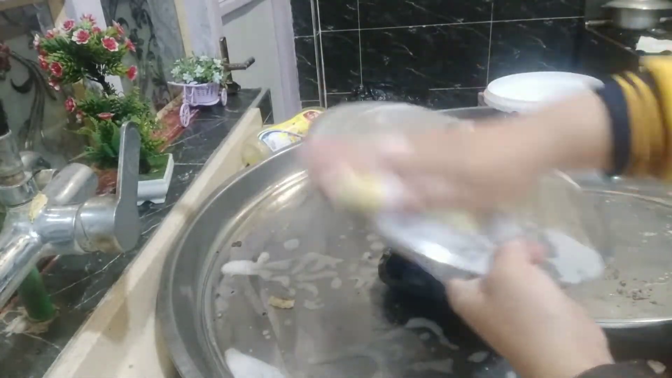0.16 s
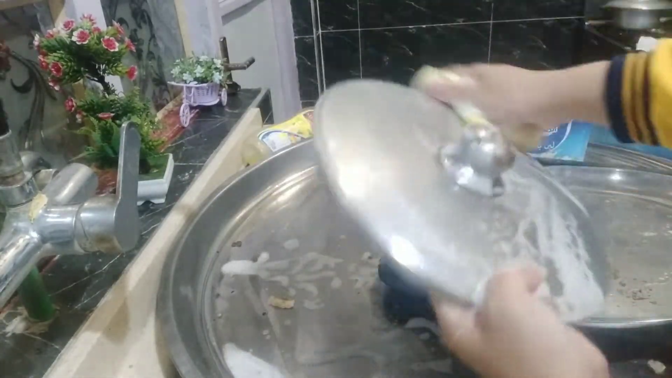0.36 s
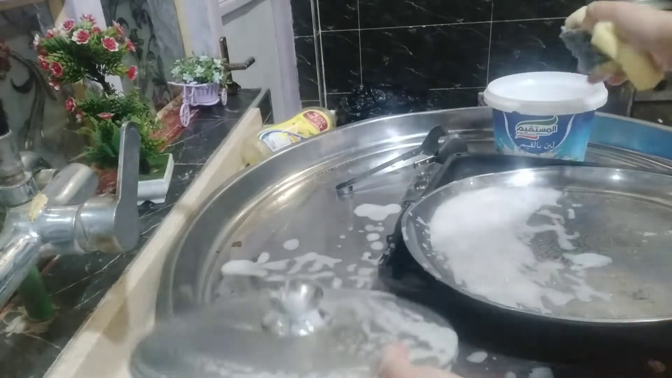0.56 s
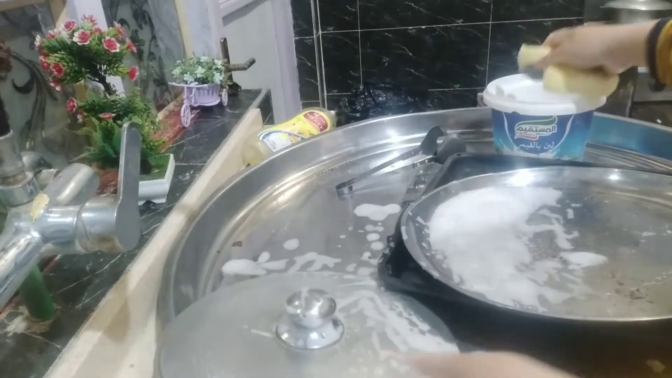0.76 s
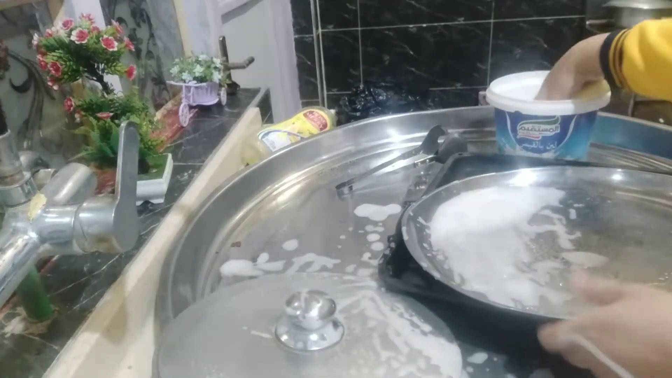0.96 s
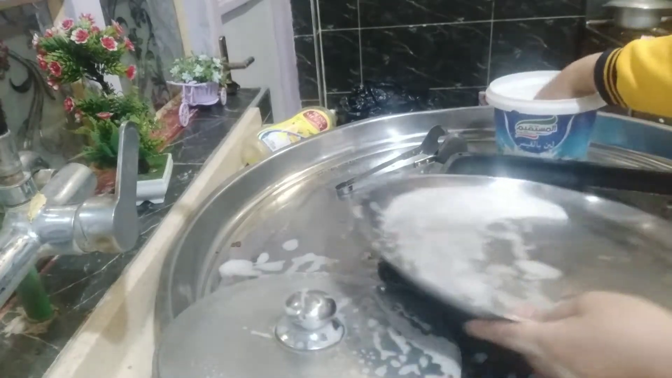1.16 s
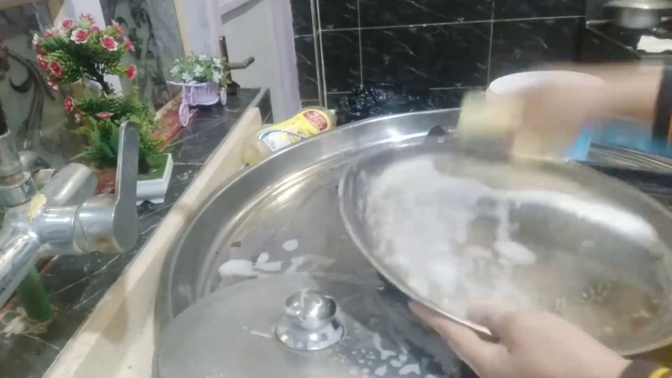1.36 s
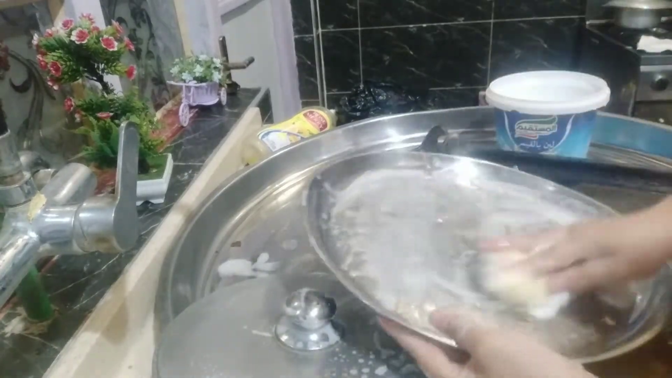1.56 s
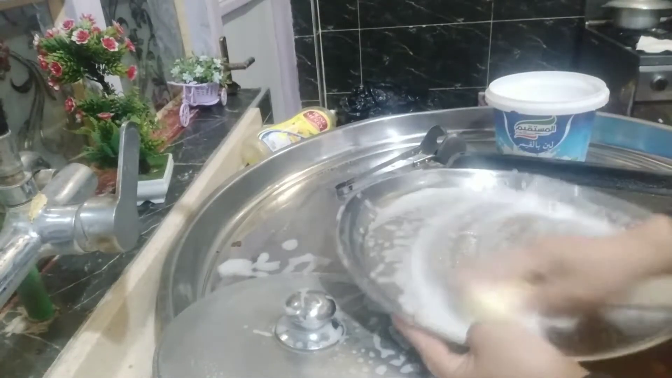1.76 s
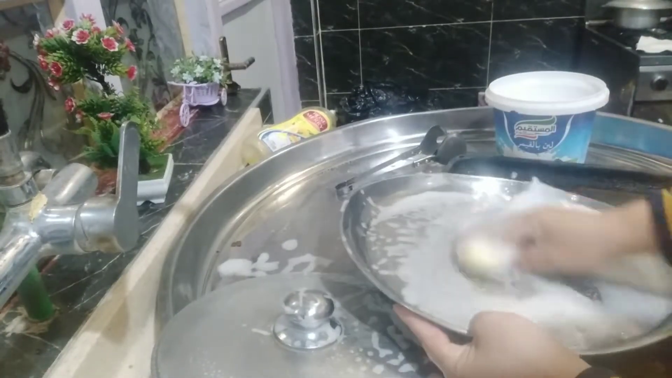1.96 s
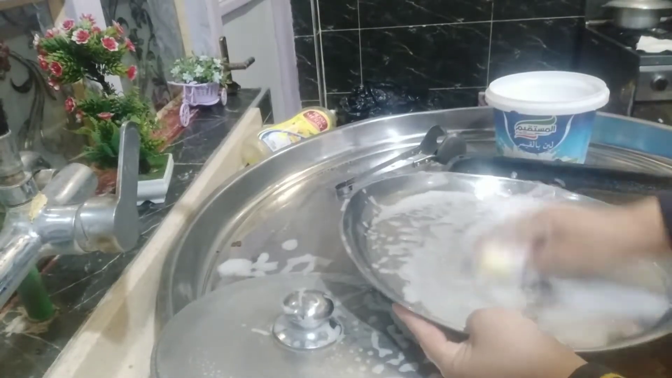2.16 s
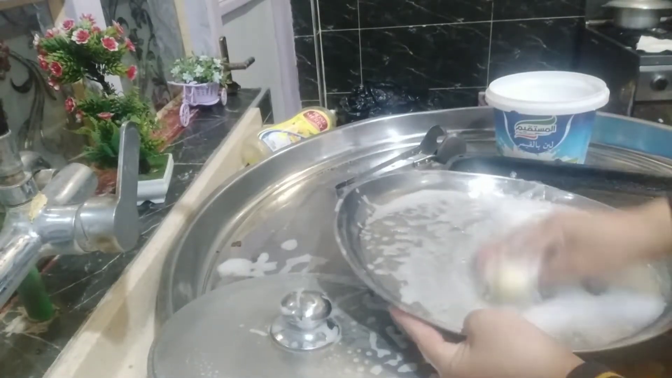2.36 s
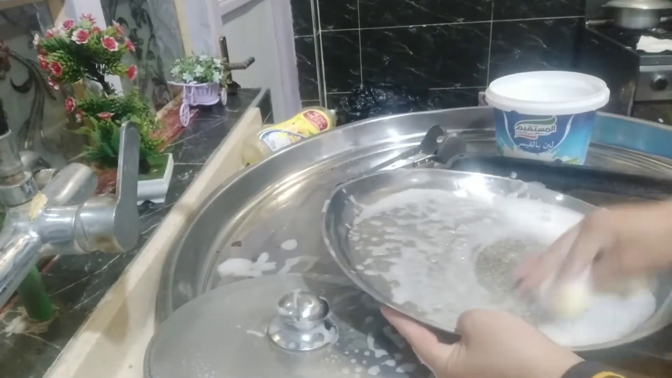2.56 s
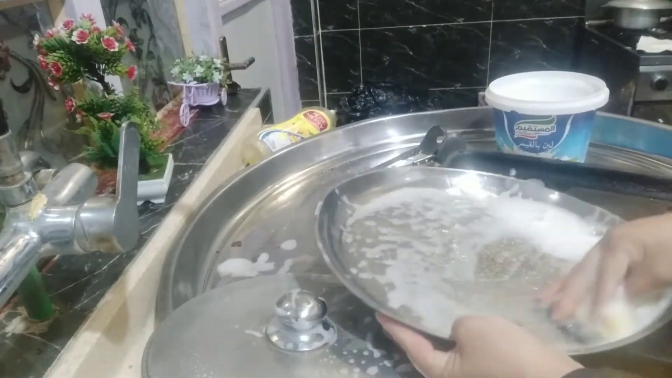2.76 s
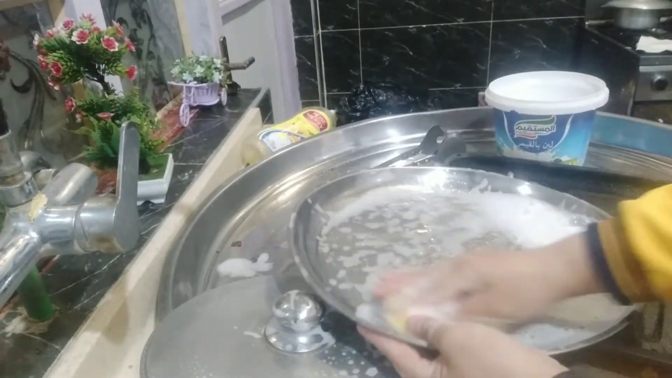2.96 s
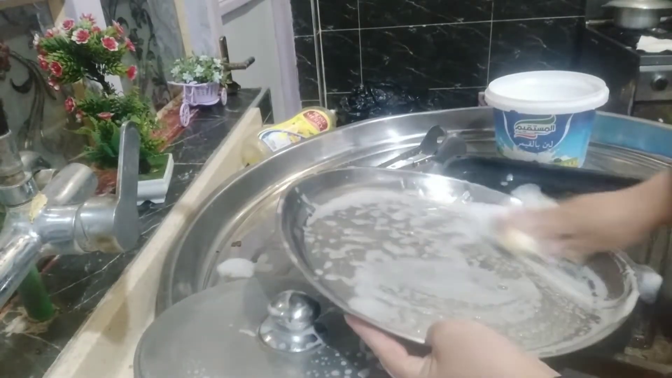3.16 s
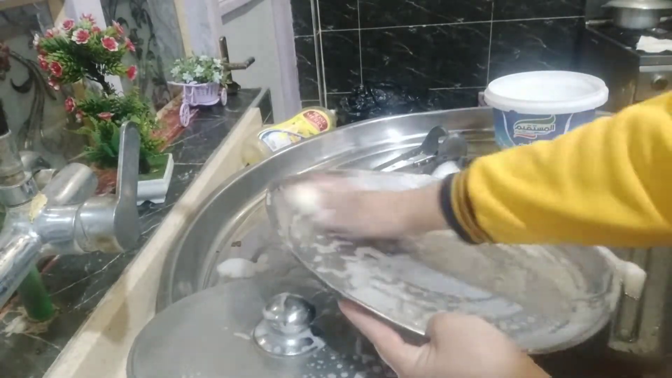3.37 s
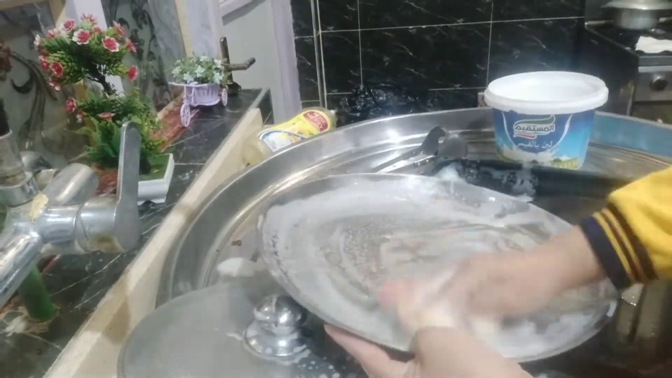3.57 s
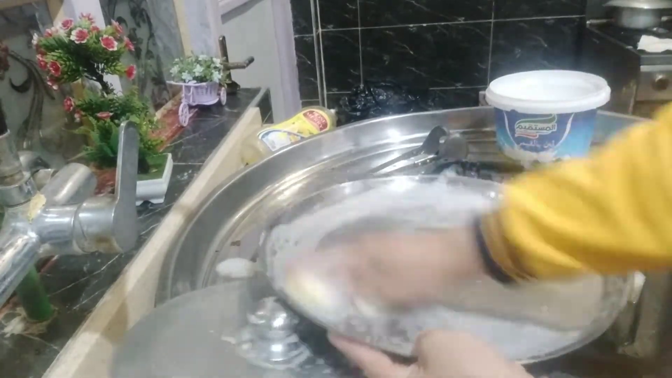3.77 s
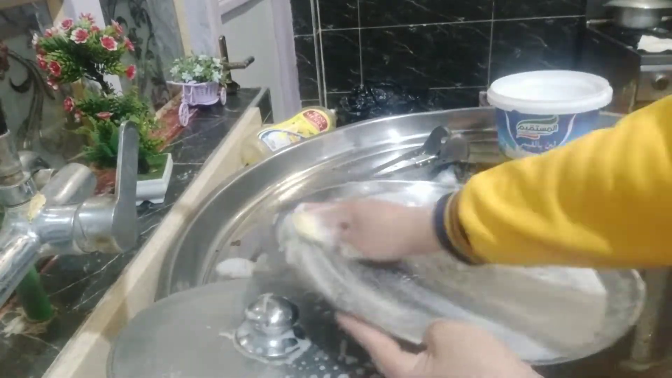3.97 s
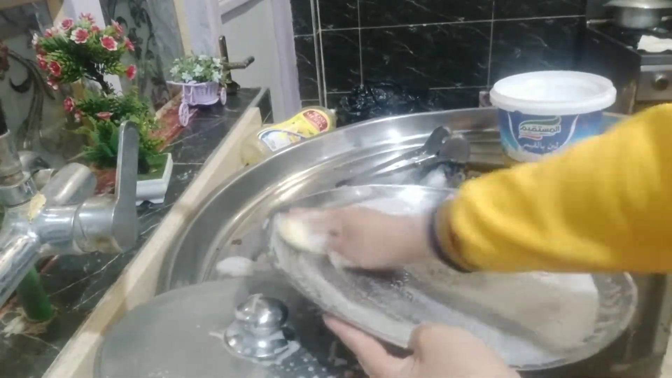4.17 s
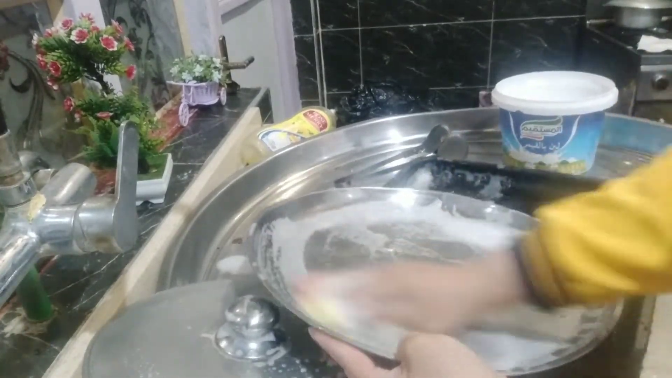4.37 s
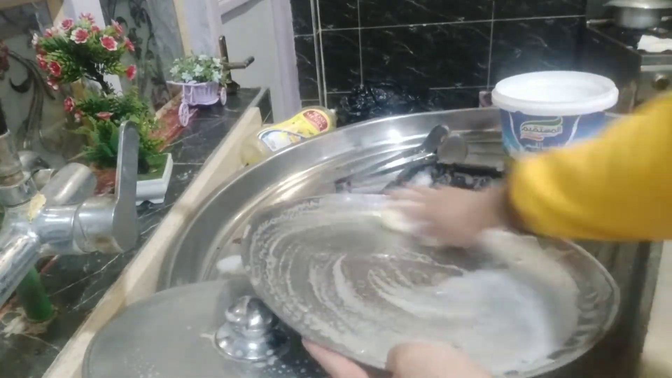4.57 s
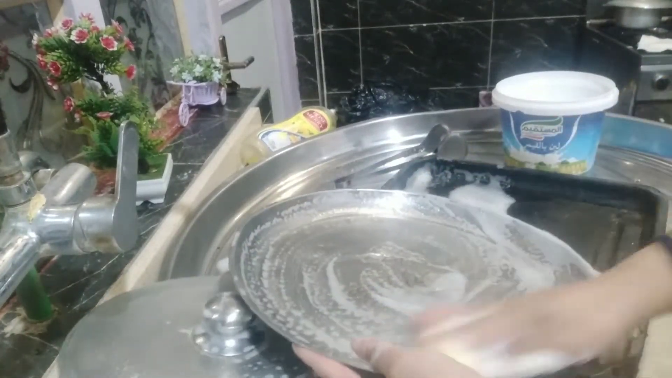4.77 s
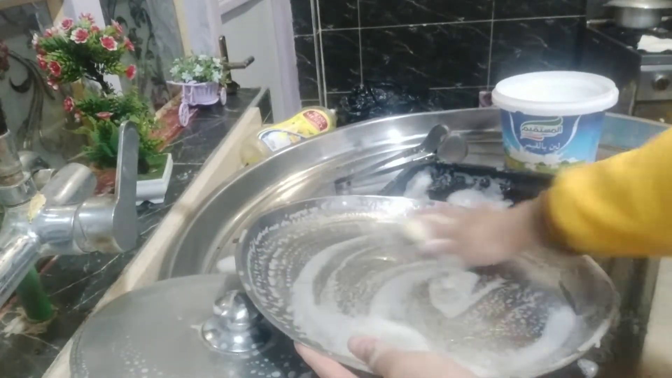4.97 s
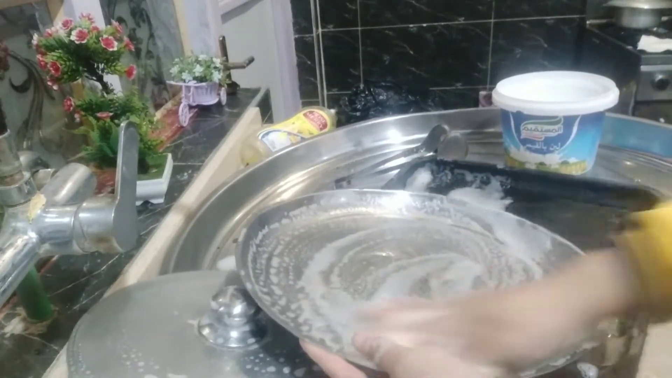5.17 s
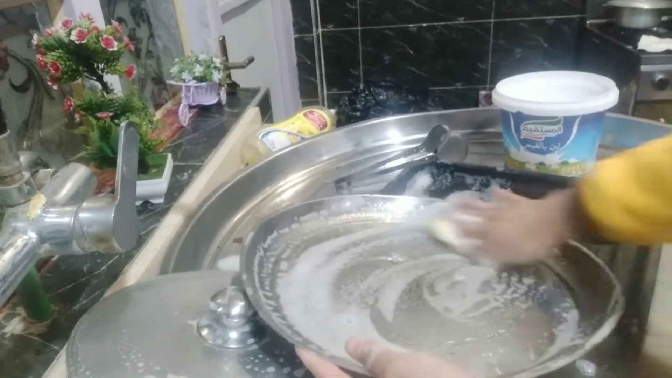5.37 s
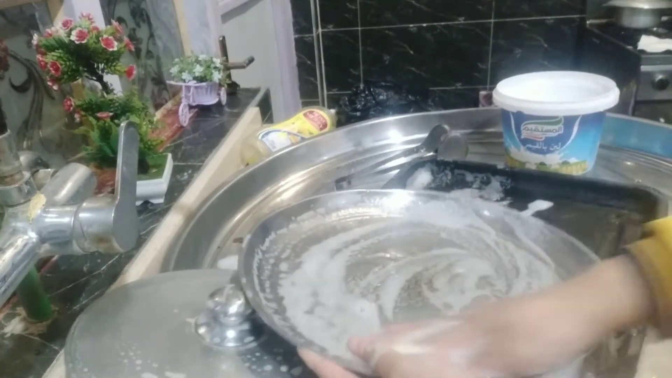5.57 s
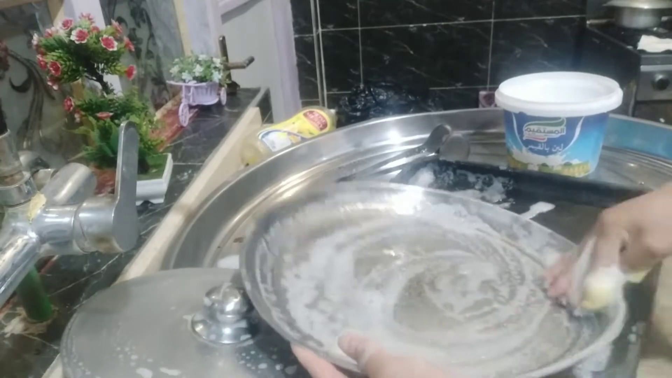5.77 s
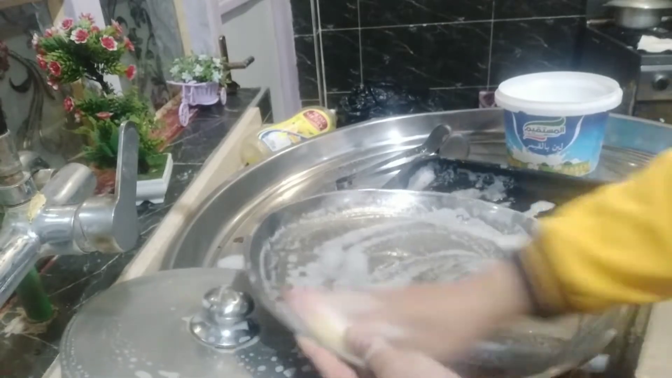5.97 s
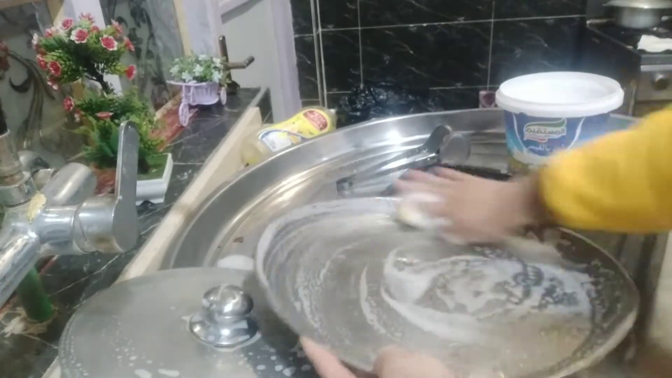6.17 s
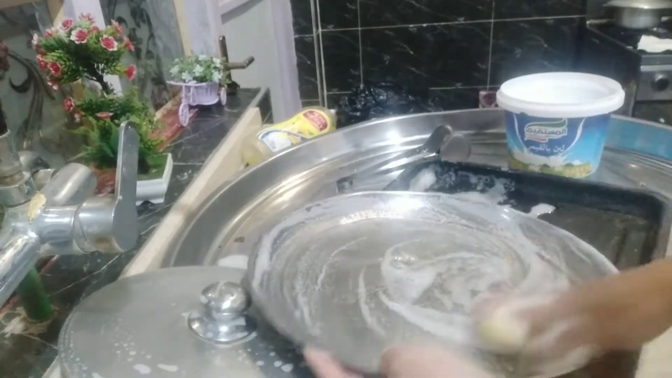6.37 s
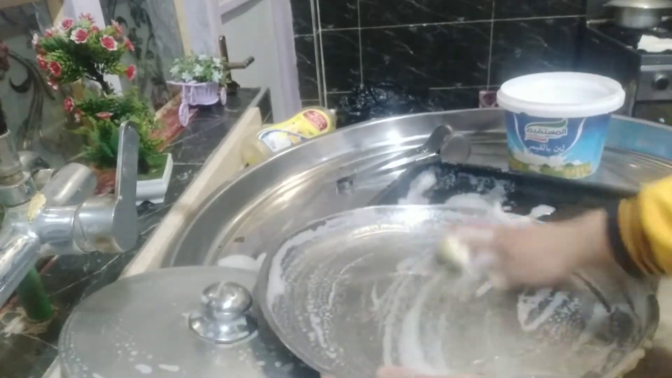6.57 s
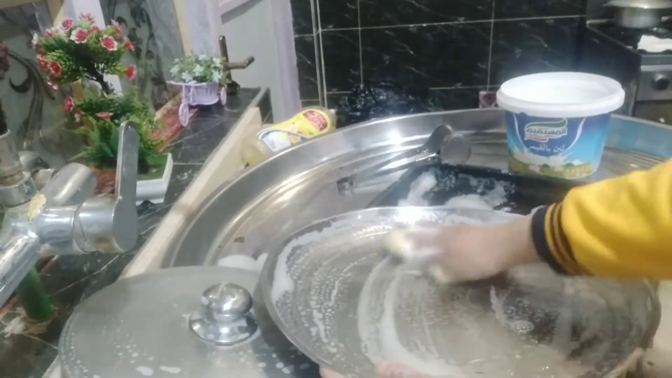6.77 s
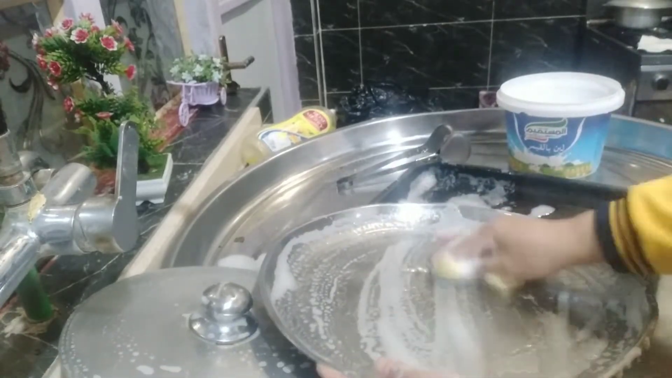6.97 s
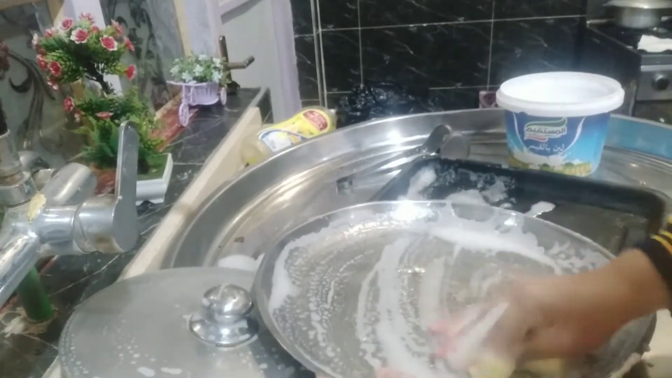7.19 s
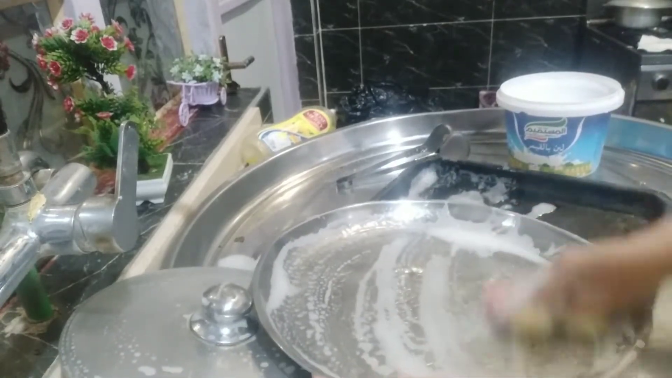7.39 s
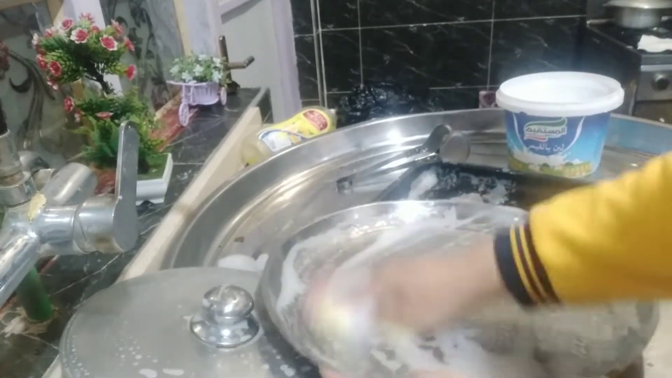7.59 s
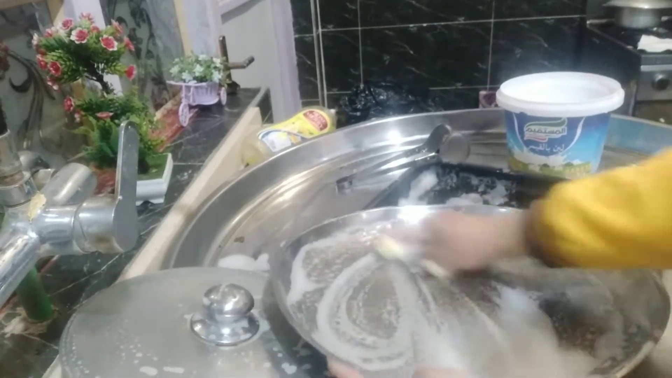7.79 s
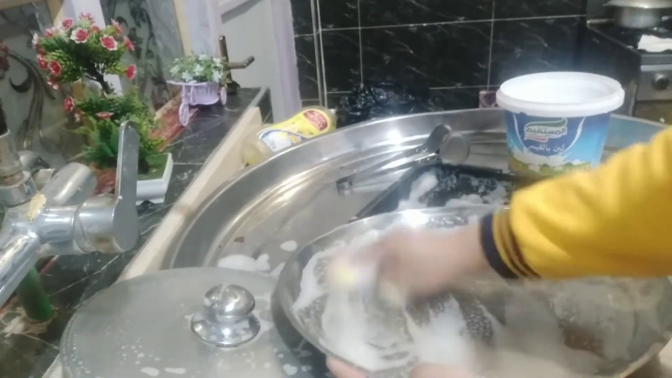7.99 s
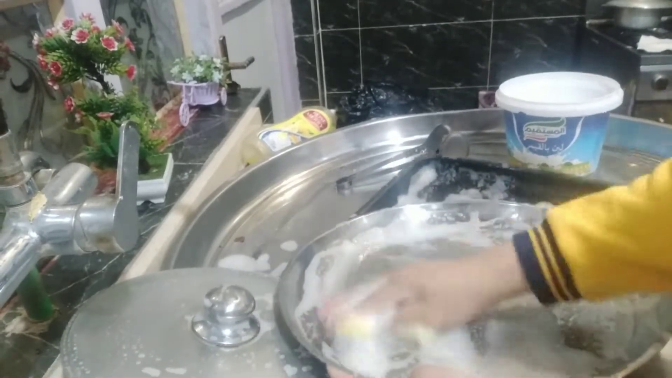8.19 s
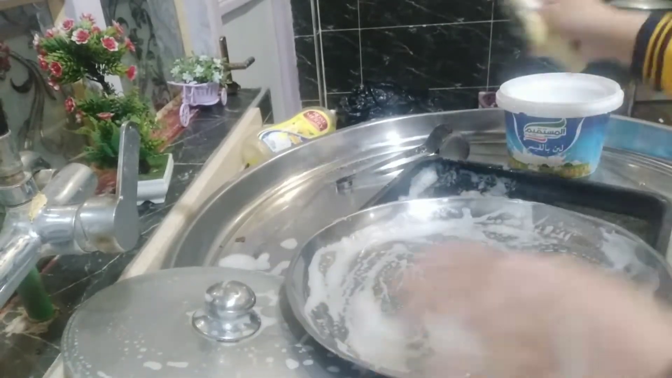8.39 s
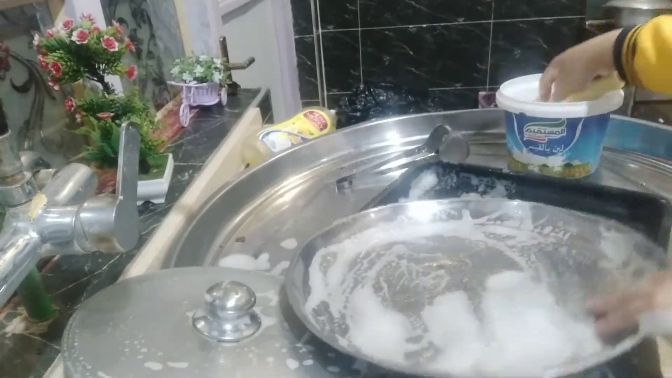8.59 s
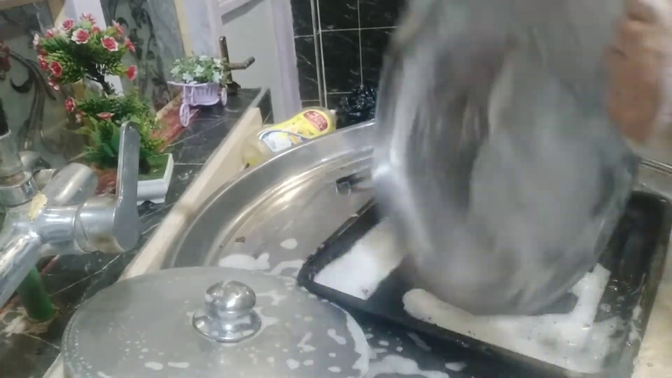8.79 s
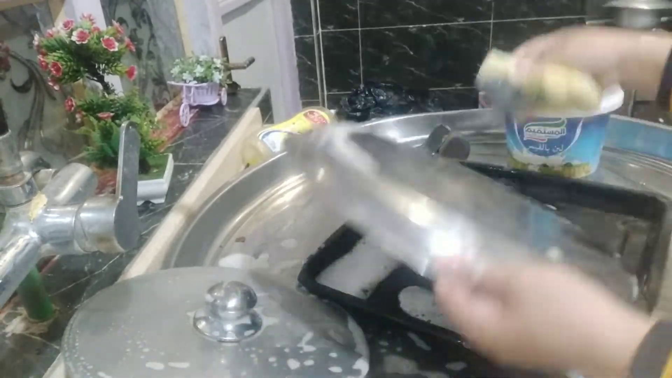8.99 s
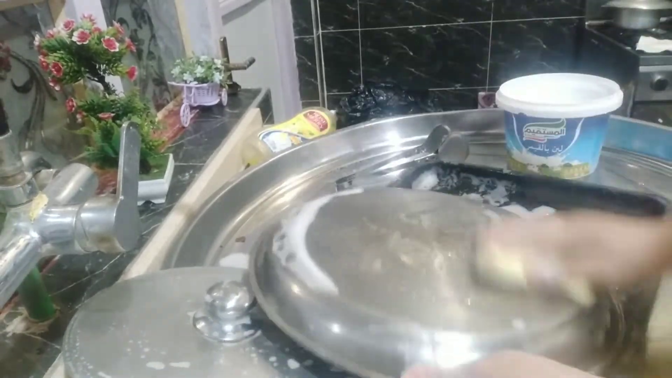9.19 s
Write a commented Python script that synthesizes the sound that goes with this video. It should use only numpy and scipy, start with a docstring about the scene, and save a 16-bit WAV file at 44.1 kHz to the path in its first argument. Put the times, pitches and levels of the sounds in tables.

```python
"""Washing up at a kitchen sink. First a sponge wipes a steel lid, which is put down with a clang.
Then the sponge dips into the soap tub, and a steel tray is picked up, soaped and scrubbed.
Many tiny clicks make the sponge hiss; short bursts of force make the tray ring, knock and rumble.
Near the end the tray is laid down, a dry tick comes from the soap tub, and the tray is lifted again.
Room tone and hum run throughout; a two-port microphone rounds off the hardest clatter."""
import sys
import numpy as np
from scipy import signal
from scipy.fft import rfft, irfft, next_fast_len
from scipy.io import wavfile

SR = 44100
rng = np.random.default_rng(int(sys.argv[2]) if len(sys.argv) > 2 else 0)


def persist_wave(psi):
    """Save psi, clipped to +-1, as 16-bit WAV."""
    counts = np.round(np.clip(psi, -1, 1) * 32767).astype(np.int16)
    wavfile.write(sys.argv[1], SR, np.atleast_2d(counts).T)


N = 407471
RING_SIZE, BLOW_SIZE = 26000, 32768   # samples in a ring and in the analysis of a blow

# Background of the room: f/Hz, relative level/dB
ROOM_TONE = [(20, -7), (50, -13), (62, 1.5), (82, -33), (200, -85), (600, -33), (1500, -45), (2300, -26),
             (8000, -51), (16000, -70)]
# Spells of rubbing: lid, soap tub, spreading soap, tray rim, wide circles, hard scouring.
# start t/s, end t/s, number of strokes, relative hiss level/dB, dip at the turns/dB, relative rumble level/dB
RUBBING_SPELLS = [(0.0, 0.103, 1, -47, -1, -59), (0.132, 0.408, 1, -48.5, 1, -52.5),
                  (0.418, 0.564, 1, -59, 8, -54), (0.986, 1.354, 1, -37.5, 13.5, -36),
                  (1.473, 1.857, 4, -40, -1.5, -34.5), (1.857, 2.639, 8, -34.5, 3, -37.5),
                  (2.713, 2.949, 2, -37, 5.5, -39), (3.004, 3.294, 3, -41.5, -2, -30.5),
                  (3.292, 3.562, 1, -42.5, 0.5, -37), (3.598, 3.884, 2, -36, 7, -38.5),
                  (3.89, 4.355, 4, -38, 7, -34.5), (4.382, 4.63, 1, -44.5, 0, -39),
                  (4.627, 5.366, 2, -37.5, 1.5, -36), (5.4, 5.652, 1, -37, 3, -32.5),
                  (5.703, 5.98, 1, -36, 6.5, -30.5), (5.97, 6.247, 1, -44, -0.5, -37.5),
                  (6.264, 6.58, 1, -39.5, -1, -33), (6.6, 7.038, 4, -32.5, 8.5, -37),
                  (7.008, 7.46, 5, -36, -2, -31), (7.51, 7.685, 1, -38.5, 3, -39),
                  (7.732, 8.162, 4, -36.5, 4.5, -37), (8.183, 8.37, 1, -38.5, 3.5, -36.5)]
# Extra treble of the fizz, strong on the smooth lid and dull in the soap tub: t/s, top level/dB
FOAM_TREBLE = [(0.35, 13), (1.0, -53), (1.4, 1.5), (1.9, 7), (8.3, 6), (8.6, -18)]
# Tone colour of the sponge: f/Hz, relative level/dB
SPONGE_COLOUR = [(300, -10), (700, -1), (1200, -2.5), (2200, -2), (4000, -1.5), (6200, -2.5), (7300, -13),
                 (9300, -15), (11500, -27.5), (16000, -28.5)]
# Tone colour of the tray under the rubbing hand: f/Hz, relative level/dB
RUMBLE_COLOUR = [(25, -8), (55, -12), (90, 3), (140, -8), (190, -6.5), (240, -3), (320, -8), (450, -5),
                 (620, 0), (800, -11.5), (1100, -13), (2500, -18.5), (6000, -68)]
# Steel on steel: lid put down, tray picked up, tray rocking on cookware, tray laid down and lifted.
# t/s, contact length/s, strength/dB, hardness/(dB per octave), thud level/dB relative to strength
STEEL_CONTACTS = [(0.016,0.00088,-27,-5.5,-41), (0.6011,0.00086,-12.5,-3.5,-10.5),
                  (0.612,0.059,-10,-3.5,-21.5), (0.68,0.0017,-17.5,-2.5,-9.5), (0.69,0.023,-18.5,-4.5,-29),
                  (0.756,0.013,-17.5,-1,-21), (0.995,0.022,-48,0,-13), (1.225,0.006,-17.5,-2,-8.5),
                  (1.414,0.0037,-37,0.5,-5), (1.452,0.014,-20,-5.5,-21), (1.499,0.011,-15.5,-7.5,-20.5),
                  (1.645,0.0028,-19,-3.5,-12), (1.713,0.0066,-13,-2.5,-8), (1.73,0.05,-13.5,-4,-8.5),
                  (1.79,0.0029,-14,-5,-16.5), (1.925,0.0027,-24,-2.5,-6.5), (2.29,0.06,-23,-5,-6),
                  (2.474,0.047,-23.5,-2.5,-4.5), (2.81,0.028,-28,-1.5,-4), (3.011,0.023,-30.5,-3.5,-7),
                  (3.034,0.014,-19,-2.5,-15), (3.1,0.0082,-19,-2.5,-8), (3.134,0.076,-19.5,-1,0),
                  (3.175,0.044,-8.5,-2,-8.5), (3.354,0.015,-17,-10,-9.5), (3.474,0.0053,-20.5,-16,-14),
                  (3.803,0.0076,-13.5,-5,-16), (3.957,0.01,-23.5,-1.5,-32), (4.051,0.023,-20,-5.5,-20),
                  (4.163,0.0066,-23.5,-2,-15), (4.24,0.008,-29,-4.5,1.5), (4.332,0.0038,-28,-4.5,-3),
                  (4.416,0.0054,-31.5,-3.5,-3), (4.517,0.013,-23.5,-3,-2), (4.678,0.015,-14,-6.5,-22),
                  (4.76,0.077,-18.5,-9,-4), (4.834,0.003,-24,-3,1), (4.858,0.013,-16.5,-6.5,-11),
                  (4.945,0.003,-23,-3,-24), (5.151,0.011,-13.5,-9,-8.5), (5.162,0.0166,-16.5,-3,-15),
                  (5.322,0.0029,-26.5,-1.5,2.5), (5.484,0.0074,-23,-11,-4), (5.563,0.0032,-24,-2.5,-25),
                  (5.616,0.01,-25.5,-2,1.5), (5.731,0.02,-24.5,-3.5,1), (5.747,0.0078,-22,-1.5,-11),
                  (5.818,0.0034,-20.5,-1.5,-16), (5.954,0.0117,-20,-3.5,-3), (5.985,0.0084,-26.5,-2,7),
                  (6.045,0.002,-25,-4.5,-6), (6.161,0.0025,-35,-6.5,-15), (6.281,0.006,-18,-10,-18),
                  (6.353,0.0015,-29,-3.5,4), (6.444,0.0099,-25,-9,-5), (6.632,0.03,-27.5,-2,-19),
                  (6.96,0.003,-30,-5.5,-4), (7.091,0.013,-10.5,1,-10.5), (7.1,0.032,-5,-2.5,-13),
                  (7.411,0.017,-26.5,-3,-2), (7.45,0.0061,-18,-8,-15), (7.723,0.026,-18,-2.5,-5),
                  (7.954,0.028,-21.5,-1.5,-5), (8.002,0.0067,-20.5,-4,-0.5), (8.08,0.038,-31,-3,5),
                  (8.259,0.011,-17.5,-0.5,-2.5), (8.28,0.056,-16,-4,-3), (8.379,0.0032,-26.5,-3.5,-10),
                  (8.4,0.0049,-25.5,-2,-4), (8.58,0.00099,-41,1,-9), (8.641,0.0021,-31,-1.5,1.5),
                  (8.68,0.12,-29.5,-3,3), (8.768,0.0098,-20,0,-11), (8.976,0.013,-18,-1.5,7),
                  (9.003,0.015,-13,-5,-15), (9.136,0.011,-17,-4.5,-4), (9.16,0.085,-23.5,-2.5,-6),
                  (9.211,0.011,-19.5,-4,-4), (9.228,0.0037,-21,-1.5,-16)]
# Limits of the thud, body, clang and crack ranges: f/Hz
RANGE_LIMITS = [70, 280, 900, 2800, 7000]
# Single notes that sing out: t/s, f/Hz, starting level/dB, time to fall by 60 dB/s
SINGING_NOTES = [(0.016, 440, -27.5, 0.11), (0.14, 430, -29.5, 0.028), (0.601, 667, -16.5, 0.3),
                 (0.681, 1020, -17.5, 0.17), (0.757, 931, -25.5, 0.25), (1.224, 2520, -14.5, 0.032),
                 (1.499, 516, -16, 0.12), (1.714, 192, -15, .15), (4.677, 945, -13, 0.093),
                 (6.282, 962, -27, 0.12), (7.103, 178, -10.5, 0.18), (7.103, 242, -6, 0.084),
                 (7.45, 579, -15.5, 0.22), (8.28, 7550, -35, 0.23), (8.733, 431, -24, 0.25),
                 (8.768, 980, -30.5, 0.22), (8.768, 1440, -32, 0.21), (8.768, 1880, -31, 0.19),
                 (8.768, 2520, -38, 0.26)]
# Clear notes of the hand-held tray: f/Hz, relative level/dB, time to fall by 60 dB/s
TRAY_NOTES = [(201.5, -19.5, 0.14), (250.6, -38, 0.31), (440, -27, 0.1), (557, -27, 0.26),
              (677.5, -24.5, 0.16), (1002, -25.5, 0.32), (1257, -31.5, 0.4), (1874, -22.5, 0.21),
              (2070, -25, 0.4), (2554, -42.5, 0.62), (3920, -41, 0.27), (4560, -28, .16),
              (5680, -21, 0.094)]
# Fading of the tray's crowded sheet notes: f/Hz, time to fall by 60 dB/s
SHEET_FADING = [(100, 0.37), (500, 0.14), (1600, 0.14), (5000, 0.11), (12000, 0.025)]
# Tone colour of a steel blow before its ranges are balanced: f/Hz, relative level/dB
STEEL_COLOUR = [(25, -39), (55, -7.5), (90, 1.5), (190, -2), (310, -5.5), (600, -9), (800, -8.5),
                (1050, -9.5), (2000, -11), (6000, -17.5), (7400, -27), (9500, -30), (12000, -45.5),
                (16000, -47)]
# Fading of the kitchen's echo: f/Hz, time to fall by 60 dB/s
KITCHEN_FADING = [(100, 0.47), (700, 0.54), (1800, 0.48), (5000, 0.41), (12000, 0.14)]
# Balance of the two microphone ports: f/Hz, left minus right level/dB
PORT_BALANCE = [(60, -1.5), (170, -2), (380, 3.3), (650, 0), (1100, -.5), (2200, 1.5), (3700, 2.5),
                (6000, 10), (7000, 3.4), (8400, -8.5), (10300, -11.5), (12400, -2), (15000, 5)]
# How alike the two ports hear a spread-out sound: f/Hz, likeness from 0 to 1
PORT_LIKENESS = [(100, 0.96), (200, 1), (380, 0.74), (700, 0.36), (1300, 0.081), (16000, 0)]


def from_db(db):
    """Turn decibels into a gain."""
    return 10 ** (np.asarray(db) / 20)


def rms_one(x):
    """Scale a sound to an rms of one."""
    return x / np.sqrt(np.mean(x ** 2) + 1e-20)


def in_time(rows):
    """Read a time curve at every sample."""
    return np.interp(np.arange(N) / SR, *np.transpose(rows))


def at_hz(points, hz):
    """Read a frequency table, with straight lines on a logarithmic frequency axis."""
    known_hz, values = np.transpose(points)
    return np.interp(np.log(hz + 1e-9), np.log(known_hz), values)


def drift(rate):
    """Wander at random through `rate` new values a second, with an rms of one."""
    knots = rng.standard_normal(4000)
    return rms_one(np.interp(np.arange(N) / SR * rate, np.arange(len(knots)), knots))


def add(out, sound, s):
    """Mix in a sound from time s, cutting off what runs past the end."""
    start = max(round(s * SR), 0)
    out[:, start:start + sound.shape[-1]] += sound[..., :N - start]


def colour(x, points):
    """Filter a sound to follow a table of f/Hz and level/dB, with no sound ahead of its cause."""
    size = 2 * next_fast_len(x.shape[-1] // 2 + 1)
    gains = from_db(at_hz(points, np.fft.rfftfreq(size, 1 / SR)))
    # folding the log spectrum forward in time gives a minimum-phase filter
    cepstrum = irfft(np.log(gains))[:size // 2]
    cepstrum[1:] *= 2
    response = np.exp(rfft(cepstrum, size))
    return irfft(rfft(x, size) * response)[..., :x.shape[-1]]


def diffuse(pair):
    """Make two unrelated signals a spread-out field: alike in the bass, unrelated in the treble."""
    size = 2 * next_fast_len(pair.shape[-1] // 2 + 1)
    alike = np.clip(at_hz(PORT_LIKENESS, np.fft.rfftfreq(size, 1 / SR)), -1, 1)
    shares = np.sqrt([1 + alike, 1 - alike])
    mid, side = irfft(rfft(pair, size) * shares)[:, :pair.shape[-1]]
    return np.array([mid + side, mid - side]) / 2


def room_tone(level_db=-54, hum_hz=50, hum_db=-54):
    """Coloured noise makes a low background rumble; a steady sine adds the mains hum."""
    air = rms_one(colour(diffuse(rng.standard_normal((2, N))), ROOM_TONE))
    hum = np.sin(2 * np.pi * hum_hz * np.arange(N) / SR)
    return from_db(level_db) * air + from_db(hum_db) * hum


def dying_noise(fading):
    """Many overlapping notes heard as noise, with a separate fade for each octave."""
    t, hz = np.arange(RING_SIZE) / SR, np.fft.rfftfreq(RING_SIZE, 1 / SR)
    white = rfft(diffuse(rng.standard_normal((2, RING_SIZE))))
    centres = 100 * 2. ** np.arange(8)
    out = 0
    for centre, weights in zip(centres, np.eye(len(centres))):
        decay = from_db(-60 * t / at_hz(fading, centre))
        octave = irfft(white * at_hz(np.transpose([centres, weights]), hz))
        out = out + octave * decay / np.linalg.norm(decay)
    return out


def rubbing():
    """Sponge speed and tray pressure: each spell rises, changes level along its strokes and dies away."""
    attack_s, release_s = 0.0083, 0.051   # length of the rise; time to fall to about a third
    pressure_follows = 0.32   # share of the dB dip that the pressure follows
    t, speed, pressure = np.arange(N) / SR, 0, 0
    for start, end, count, hiss_db, dip_db, rumble_db in RUBBING_SPELLS:
        rise = np.clip((t - start) / attack_s + .5, 0, 1)
        spell = rise * np.exp(-np.clip((t - end) / release_s, 0, 20))
        progress = np.clip((t - start) / (end - start), 0, 1)
        # a negative dip makes the turns louder instead
        turn_db = -dip_db * np.cos(np.pi * round(count) * progress) ** 2
        speed = np.maximum(speed, spell * from_db(hiss_db + turn_db))
        pressure = np.maximum(pressure, spell * from_db(rumble_db + pressure_follows * turn_db))
    return speed, pressure


def grains(per_s, spread_db):
    """Random clicks of uneven size, like tiny separate touches."""
    sizes = from_db(spread_db * np.minimum(rng.exponential(1, N), 5))
    return rms_one((rng.random(N) < per_s / SR) * sizes * rng.standard_normal(N))


def sponge(kitchen, hand_speed, level_db=2.0, room_db=-8, turns_per_s=2.2, echo_s=0.000914,
           sweep=0.388, echo_db=-9):
    """Fibres flick over steel and foam bursts; the echo off the tray sweeps as the hand circles."""
    flutter_db, flutters_per_s, grain_db = 1.1, 70, 2.2
    speed = hand_speed * from_db(flutter_db * drift(flutters_per_s))
    fizz = speed * diffuse(np.array([grains(14000, grain_db) for _ in range(2)]))
    n = np.arange(N)
    circling = np.sin(2 * np.pi * turns_per_s * n / SR + drift(2))
    lag = echo_s * SR * (1 + sweep * circling)   # samples
    echo = np.array([np.interp(n - lag, n, side) for side in fizz])
    fizz = fizz + from_db(echo_db) * echo
    treble_filter = signal.butter(1, 9000, "high", fs=SR, output="sos")
    top = signal.sosfilt(treble_filter, fizz)
    fizz = fizz + (from_db(in_time(FOAM_TREBLE)) - 1) * top
    fizz = fizz + from_db(room_db) * signal.oaconvolve(fizz, kitchen, axes=1)[:, :N]
    # the average strength of the strokes sets the final level
    return from_db(level_db) * np.sqrt(np.mean(speed ** 2)) * rms_one(colour(fizz, SPONGE_COLOUR))


def ring(hz, t60):
    """One sine note that falls by 60 dB in t60 seconds."""
    t = np.arange(RING_SIZE) / SR
    return np.sin(2 * np.pi * hz * t) * np.exp(-np.log(1000) * t / t60)


def tray_response(kitchen, direct_db=-12, modes_db=-5, room_db=-5, spot_db=3, max_port_lag_s=0.00054):
    """One touched spot answers with a crack, crowded sheet notes, a few clear notes and the room."""
    out = from_db(room_db) * kitchen + dying_noise(SHEET_FADING)
    near = np.zeros(RING_SIZE)
    near[0] = from_db(direct_db)
    for hz, level_db, t60 in TRAY_NOTES:
        mode = ring(hz, t60) * rng.choice([-1, 1])
        mode_db = modes_db + level_db + spot_db * rng.standard_normal()
        near += from_db(mode_db) * mode / np.linalg.norm(mode)
    # the spot lies nearer to one port than to the other
    lags = (rng.random(2) * max_port_lag_s * SR).astype(int)
    return out + np.array([np.pad(near, (lag, 0))[:RING_SIZE] for lag in lags])


def drive(force, spots, count=2):
    """Deal the samples of a force in turn to a few random tray spots, each with its own ring."""
    dealt = np.arange(len(force)) % count
    chosen = rng.permutation(len(spots))[:count]
    return sum(signal.oaconvolve(spots[spot], (force * (dealt == k))[None], axes=1)
               for k, spot in enumerate(chosen))


def tray_rumble(spots, hand_pressure, level_db=-1):
    """The dragging sponge sticks and slips, which keeps the tray's low notes going."""
    judder_db, judders_per_s = 2.5, 28
    pressure = hand_pressure * from_db(judder_db * drift(judders_per_s))
    body = drive(pressure * grains(1500, 2.3), spots)[:, :N]
    return from_db(level_db) * np.sqrt(np.mean(pressure ** 2)) * rms_one(colour(body, RUMBLE_COLOUR))


def contact_force(length, slips_per_s=2400, uneven_db=3.0, landing=1.98, easing=0.38):
    """A rim lands, then skids in tiny slips that ease off; a short contact is mostly a knock."""
    size = 6000
    phase = np.arange(size) / (max(length, 1 / 1000) * SR)
    slips = (rng.random(size) < slips_per_s / SR) * from_db(uneven_db * rng.standard_normal(size))
    slips = slips * rng.choice([-1, 1], size)
    force = slips * np.maximum(1 - phase, 0) ** easing
    force[0] = landing
    return force


def ranges_of(centres, strength_db, hardness, thud_db):
    """Hardness tilts energy between body, clang and crack; the thud is set separately."""
    clang_db = 2   # lift of the clang range before the three upper ranges share the energy
    tilt_db = hardness * np.log2(centres[1:] / centres[2])
    spread = from_db(tilt_db + clang_db * np.array([0, 1, 0]))
    shares_db = 20 * np.log10(spread / np.linalg.norm(spread))
    return strength_db + np.append(thud_db, shares_db)


def clatter(spots, level_db=0):
    """Contacts drive the tray, each with its own balance of ranges; single notes sing out."""
    out, edges = np.zeros((2, N)), np.array(RANGE_LIMITS)
    centres, bins = np.sqrt(edges[:-1] * edges[1:]), edges * BLOW_SIZE // SR
    blow_s = .02   # time over which a blow's power is averaged
    for s, length, strength_db, hardness, thud_db in STEEL_CONTACTS:
        ranges_db = ranges_of(centres, strength_db, hardness, thud_db)
        blow = colour(drive(contact_force(length), spots), STEEL_COLOUR)
        power = np.sum(np.abs(rfft(blow, BLOW_SIZE)) ** 2, axis=0) / (BLOW_SIZE * blow_s * SR)
        own_db = 10 * np.log10(np.add.reduceat(power, bins)[:-1])
        # move each range from its own level towards the wanted one
        add(out, colour(blow, np.transpose([centres, ranges_db - own_db])), s)
    for s, hz, start_db, t60 in SINGING_NOTES:
        add(out, from_db(start_db) * ring(hz, t60), s)
    return from_db(level_db) * out


def dry_tick(s=8.6425, peak_db=-13, t60=0.0084, top_hz=8500):
    """A quick noise burst makes one crisp tick as the hand reaches the plastic soap tub."""
    decay = np.exp(-np.log(1000) * np.arange(RING_SIZE) / SR / t60)
    noise = diffuse(rng.standard_normal((2, RING_SIZE)))
    tick = colour(noise * decay, SPONGE_COLOUR)
    tick = signal.sosfilt(signal.butter(2, top_hz, fs=SR, output="sos"), tick)
    out = np.zeros((2, N))
    add(out, from_db(peak_db) * tick / np.abs(tick).max(), s)
    return out


def scene():
    """Add the background, sponge, tray and soap tub together in one kitchen."""
    kitchen = dying_noise(KITCHEN_FADING)
    spots = [tray_response(dying_noise(KITCHEN_FADING)) for _ in range(11)]
    speed, pressure = rubbing()
    washing = sponge(kitchen, speed) + tray_rumble(spots, pressure)
    return room_tone() + washing + clatter(spots) + dry_tick()


def record(dry):
    """Each port has its own tone; peaks are rounded at full scale and the top is cut."""
    hz, lean_db = np.transpose(PORT_BALANCE)
    # keeps the mean power gain of the two ports at one
    mean_db = 10 * np.log10(np.cosh(lean_db * np.log(10) / 10 / 2))
    ports = np.array([colour(x, np.transpose([hz, sign * lean_db / 2 - mean_db]))
                      for x, sign in zip(dry, (1, -1))])
    rounded = ports / (1 + ports ** 6) ** (1 / 6)
    low_pass = signal.ellip(10, .2, 70, 16000, fs=SR, output="sos")   # cuts above 16000 Hz
    return signal.sosfilt(low_pass, rounded)


dry = scene()
out = record(dry)
persist_wave(out)
```